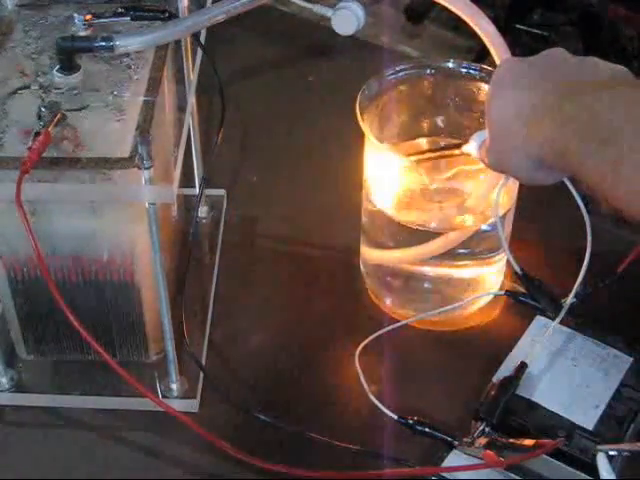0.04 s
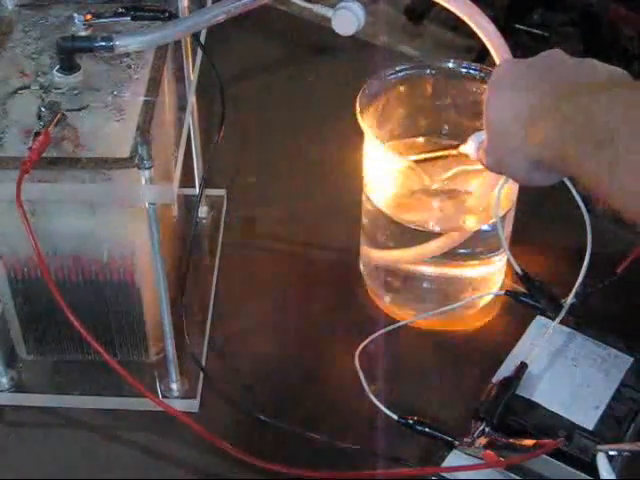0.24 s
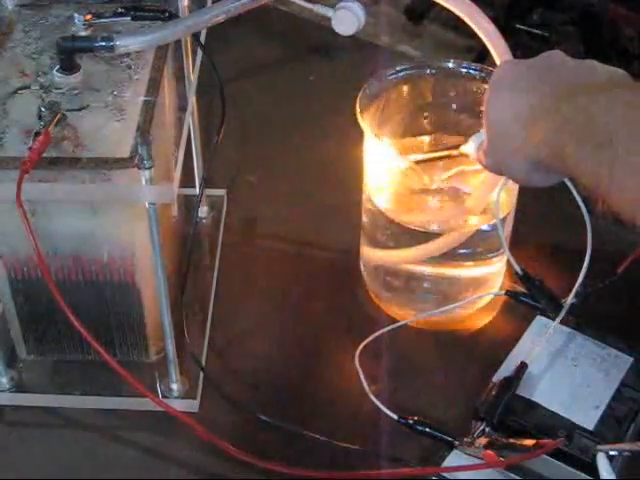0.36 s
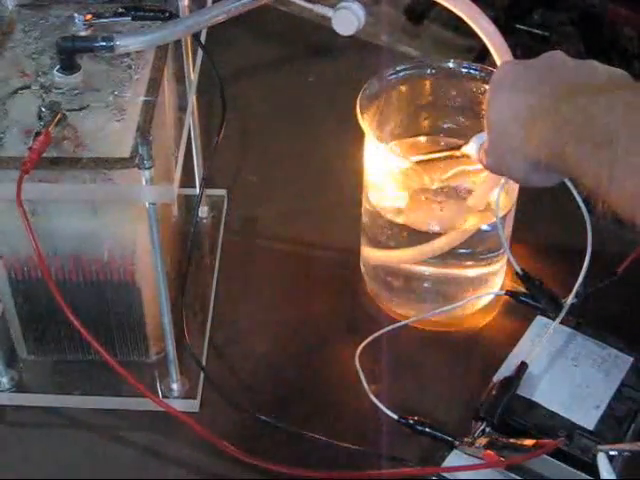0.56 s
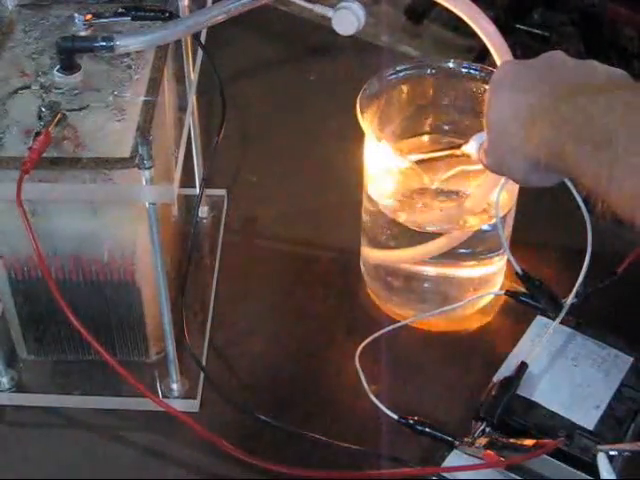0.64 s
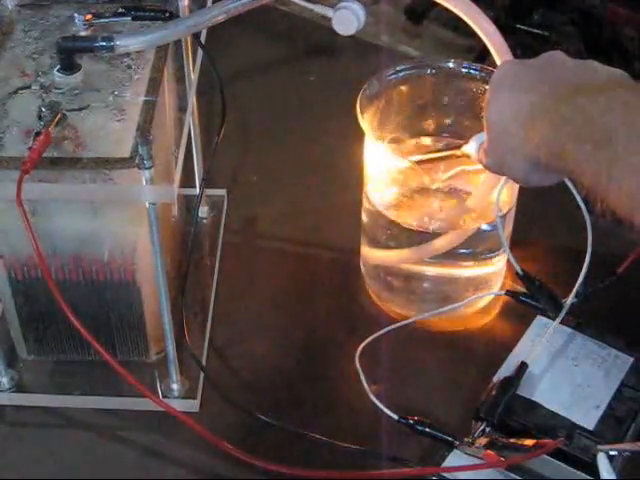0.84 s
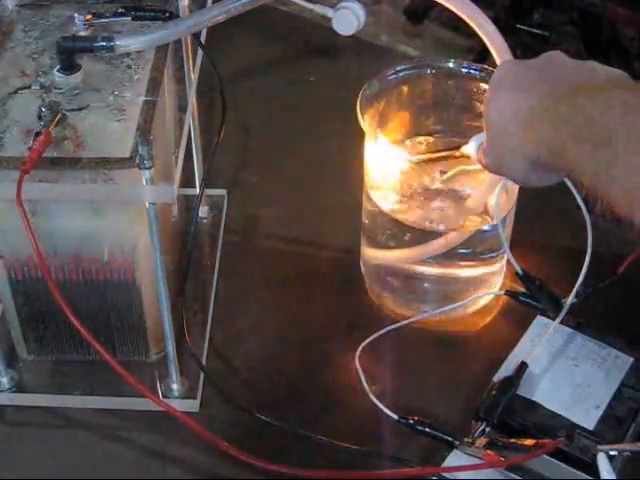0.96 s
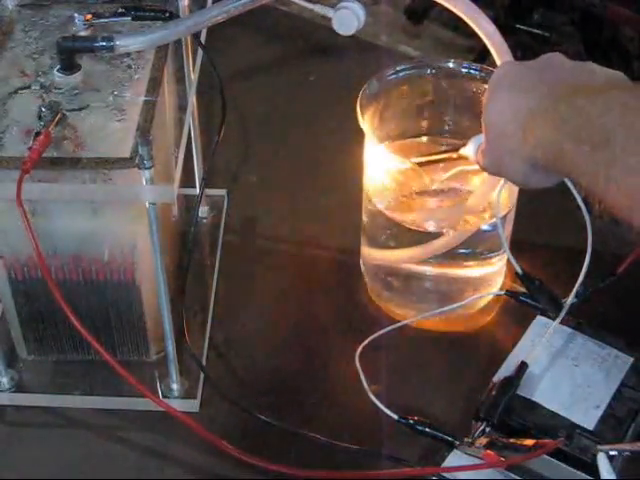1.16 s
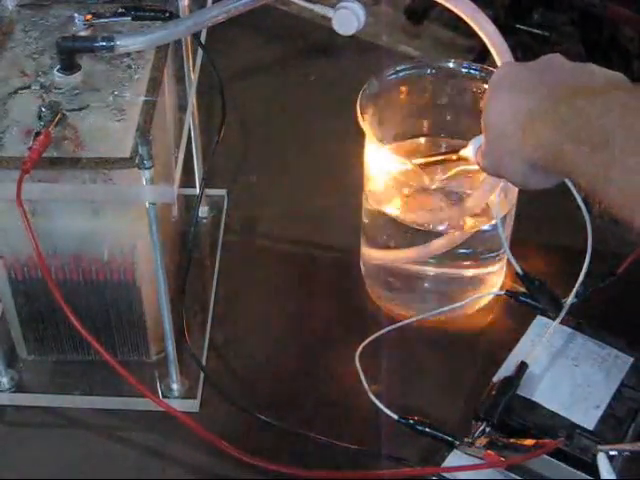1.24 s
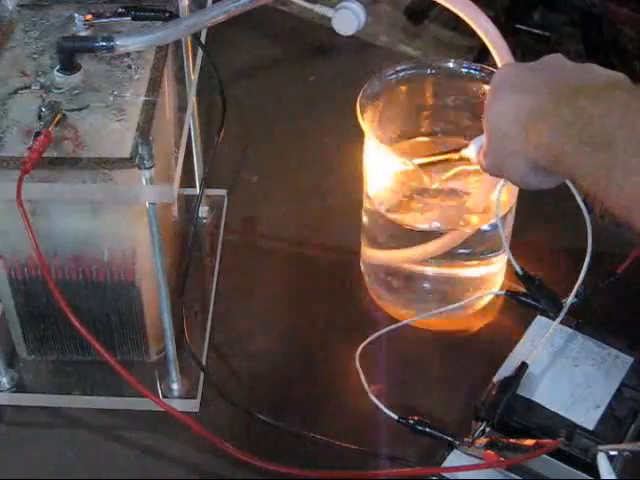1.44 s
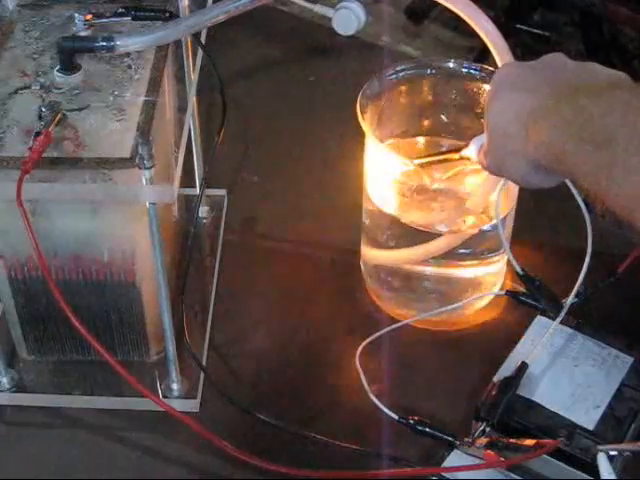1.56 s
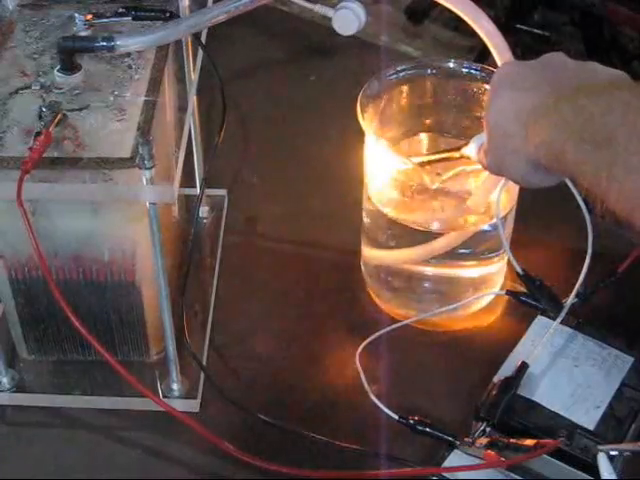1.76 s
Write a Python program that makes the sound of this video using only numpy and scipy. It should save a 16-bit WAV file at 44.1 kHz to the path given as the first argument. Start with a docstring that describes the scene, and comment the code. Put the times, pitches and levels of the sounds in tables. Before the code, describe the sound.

Three sharp pops of gas bubbles igniting on water, with soft glugs and hiss.

```python
"""Gas bubbles ignite at the water surface of a glass beaker in a small room. First the echoes of a pop die away.
At 0.2 s a bubble thumps and bangs, exciting the resonances of the beaker's air; bench and walls reflect it.
From 0.6 s bubbles oscillate under water in soft glugs and a rush of gas swells, falling back after the next
pop at 1.0 s. More glugs lead to a last pop at 1.5 s, and the rush starts to rise again. Throughout, a small
camera rounds the peaks by saturation and adds the grainy quantisation hiss of its coarse converter."""
import sys
import numpy as np
from scipy import signal
from scipy.fft import rfft, irfft, next_fast_len
from scipy.io import wavfile

SR = 44100
rng = np.random.default_rng(int(sys.argv[2]) if len(sys.argv) > 2 else 0)


def transcribe(u):
    """Save the signal u as a 16-bit wav file named by the first command-line argument.

    u: samples, shape (n,) or (channels, n), limited to [-1, 1]; the rate is SR.
    q: integer samples, one column per channel.
    """
    v = np.clip(np.atleast_2d(u).T, -1, 1)
    q = np.round(v * 32767).astype(np.int16)
    wavfile.write(sys.argv[1], SR, q)


N = 79380

# ignitions: t/s, level/dB, thump-to-bang delay/s, thump f/Hz, thump level/dB, snap f/Hz, snap level/dB,
# crack level/dB, crack cutoff f/Hz, glass f/Hz, glass level/dB; all levels are relative gains
POPS = [(-0.112, -1.5, 0.00036, 235, -3.5, 1120, -12.5, 1.5, 3020, 1880, -46.5),
        (0.209, 0, 0.00048, 242.6, -0.5, 1250, -1.5, 1, 5360, 2990, -47),
        (1.038, 0.5, 0.00002, 241.7, 4, 1067, -10.5, -1, 3240, 1932, -41),
        (1.4657, 0, 0, 277, 0, 1016, -13.5, -1, 2740, 2840, -48.5)]
def pops(response):
    """Convolution: each pop excites the room; the first, before t = 0, leaves only its decay."""
    out = np.zeros(N)
    for start, db, *character in POPS:
        add(out, undb(db) * signal.fftconvolve(pop(*character), response)[:N], start)
    return out


THUMP_DB, THUMP_T60_S = -5, .013
SNAP_T60_S, GLASS_T60_S = .0086, .2  # the snap is an upper resonance of the beaker's air, tuned per pop
BURN_S = .00052  # time for the flame to cross a bubble
CRACK_DELAY_S = .0011  # after the bang
# modes of the air in the beaker: f/Hz, level/dB, T60/s
BEAKER_MODES = [(491.3, -11.5, .019), (742.4, 2.5, .0125), (2399, -20.5, .007)]
def pop(delay, thump_hz, thump_db, snap_hz, snap_db, crack_db, crack_hz, glass_hz, glass_db):
    """Impulse excitation: a bubble ignites with a thump, and its bang sets air and glass ringing."""
    out = undb(THUMP_DB + thump_db) * ring(thump_hz, THUMP_T60_S)
    air = sum(undb(db) * ring(hz, t60) for hz, db, t60 in BEAKER_MODES)
    snap = undb(snap_db) * ring(snap_hz, SNAP_T60_S)
    glass = undb(glass_db) * ring(glass_hz, GLASS_T60_S)
    add(out, (air + snap) * swell(BURN_S) + glass, delay)
    add(out, crack(crack_db, crack_hz), delay + CRACK_DELAY_S)
    return out + hollow()


CRACK_DB, CRACK_T60_S, CRACK_RISE_S = -9, .008, .00025
# spectrum of the crack before its low-pass: f/Hz, level/dB
CRACK_SPECTRUM = [(100, -25.5), (700, 5.5), (1300, -3.5), (1700, -11), (2500, -3), (4000, -8.5),
                  (5500, -7.5)]
def crack(db, cutoff_hz):
    """Broadband transient: the sharp edge of the bang is a brief burst of noise."""
    lowpass = signal.butter(3, cutoff_hz, fs=SR, output="sos")
    burst = signal.sosfilt(lowpass, noise(CRACK_SPECTRUM))
    return undb(CRACK_DB + db) * burst * fade(CRACK_T60_S) * swell(CRACK_RISE_S)


HOLLOW_HZ, HOLLOW_RISE_HZ_PER_S, HOLLOW_DB, HOLLOW_T60_S = 111, 420, -38, .4
def hollow():
    """Cavity resonance: the hollow blown into the water closes with a faint rising note."""
    t = np.arange(N) / SR
    mean_hz = HOLLOW_HZ + HOLLOW_RISE_HZ_PER_S * t / 2
    return undb(HOLLOW_DB) * ring(mean_hz, HOLLOW_T60_S)


GLUG_T60_S, GLUG_RISE_S = .02, .00056
CHURN_DB, CHURN_T60_S = -14, .25
# spectrum of the churning water: f/Hz, level/dB
CHURN_SPECTRUM = [(80, -20.5), (180, -3), (320, -1), (450, -5), (700, -21.5), (2000, -28)]
# bubbles leaving the tube under water: t/s, level/dB, f/Hz
GLUGS = [(0.6016, -32, 333.5), (0.6111, -31, 262), (0.628, -35, 362), (0.9938, -25, 363),
         (1.0064, -25.5, 259), (1.0162, -27, 311), (1.3983, -32.5, 318), (1.4079, -29.5, 307.5)]
def glugs(response):
    """Damped oscillation: each bubble breaks loose, wobbles for a few cycles and churns the water."""
    out = np.zeros(N)
    for start, db, hz in GLUGS:
        wobble = 2 * ring(hz, GLUG_T60_S)
        churn = undb(CHURN_DB) * noise(CHURN_SPECTRUM) * fade(CHURN_T60_S)
        glug = (wobble + churn) * swell(GLUG_RISE_S)
        add(out, undb(db) * signal.fftconvolve(glug, response)[:N], start)
    return out


# envelope of the gas stream: t/s, level/dB
RUSH_ENVELOPE = [(0, -59.5), (0.539, -63.5), (.66, -46), (.76, -42.5), (.86, -37), (.98, -36.5),
                 (1.081, -42), (1.198, -62.5), (1.661, -60), (1.8, -47)]
# its spectrum: f/Hz, level/dB
RUSH_SPECTRUM = [(25, 1.5), (65, 6), (150, -9), (300, -1.5), (450, -3.5), (620, -2.5), (850, -1),
                 (1200, -10), (2000, -16.5), (3500, -21.5), (5500, -22)]
def gas_rush():
    """Flow noise: gas streams more strongly for a while, dies back and begins to build again."""
    times, levels = np.array(RUSH_ENVELOPE).T
    level_db = np.interp(np.arange(N) / SR, times, levels)
    return noise(RUSH_SPECTRUM) * undb(level_db)


TAIL_DB, TAIL_T60_S, ROOM_BUILD_S = -13.5, .55, .015
# echoes from bench, apparatus and walls: delay t/s, level/dB
ECHOES = [(0.0036, -10), (0.0057, -5), (0.0131, -19.5), (0.0188, -19.5), (0.0222, -15.5), (0.0268, -19),
          (0.0303, -18.5), (0.0386, -21.5), (0.0419, -21.5), (0.0459, -19), (0.0589, -17.5), (0.0631, -27),
          (0.0722, -25.5), (0.0759, -20.5), (0.0832, -27.5), (0.0908, -26.5), (0.1044, -26.5),
          (0.1119, -29), (0.1234, -27.5), (0.1469, -35)]
# filter on the reflected sound: f/Hz, level/dB
REFLECTION_SPECTRUM = [(40, -42), (90, -30), (130, -13.5), (200, -11.5), (300, -5.5), (400, -8),
                       (480, -2.5), (600, 2.5), (740, -.5), (920, 2.5), (1200, -11), (1500, -14.5),
                       (2000, -5.5), (5500, -7.5)]
# lingering resonances of the room: f/Hz, level/dB, T60/s
ROOM_MODES = [(373, -66.5, .35), (474, -66.5, .35), (525.1, -63, 0.41), (599.3, -60, 0.28),
              (686.6, -63.5, .45), (770.4, -67.5, .45), (858.3, -66.5, .38), (1017, -67.5, 0.26)]
def room_response():
    """Reverberation: the direct impulse is followed by echoes, a diffuse tail and room modes."""
    reflections = rng.standard_normal(N) * fade(TAIL_T60_S) * swell(ROOM_BUILD_S)
    reflections *= undb(TAIL_DB) / np.linalg.norm(reflections)
    for delay, db in ECHOES:
        reflections[int(delay * SR)] += undb(db)
    modes = sum(undb(db) * ring(hz, t60) for hz, db, t60 in ROOM_MODES) * swell(ROOM_BUILD_S)
    return signal.unit_impulse(N) + colour(reflections, REFLECTION_SPECTRUM) + modes


AIR_DB, HUM_HZ, HUM_DB = -49, 296.5, -62
# spectrum of the room air: f/Hz, level/dB
AIR_SPECTRUM = [(20, 5), (70, 7), (170, -5), (300, -4), (450, -6), (780, 3), (1100, -7), (2000, -13.5),
                (5500, -20)]
def background():
    """Stationary noise floor: quiet room air and a faint electrical hum."""
    hum = np.sqrt(2) * np.sin(2 * np.pi * HUM_HZ * np.arange(N) / SR)
    return undb(AIR_DB) * noise(AIR_SPECTRUM) + undb(HUM_DB) * hum


def undb(db):
    """Amplitude ratio of a level in decibels."""
    return 10 ** (np.asarray(db) / 20)


def colour(x, points):
    """Minimum-phase filtering through points of f/Hz, level/dB."""
    size = next_fast_len(2 * N)
    hz, db = np.array(points, float).T
    f = np.maximum(np.fft.rfftfreq(size, 1 / SR), 1)
    gain = undb(np.interp(np.log(f), np.log(hz), db))
    cepstrum = irfft(np.log(gain), size)
    cepstrum[1:size // 2] *= 2  # folding onto positive time makes the filter causal
    cepstrum[size // 2 + 1:] = 0
    return irfft(rfft(x, size) * np.exp(rfft(cepstrum)), size)[:len(x)]


def noise(points):
    """Spectrally shaped noise of rms 1 within the band of the converter."""
    white = rng.standard_normal(N // HOLD_SAMPLES + 1)
    x = colour(signal.resample_poly(white, HOLD_SAMPLES, 1)[:N], points)
    return x / np.std(x)


def swell(seconds):
    """Exponential attack with the given time constant."""
    return 1 - np.exp(-np.arange(N) / SR / seconds)


def fade(t60):
    """Exponential decay by 60 dB in t60 seconds."""
    return np.exp(-np.log(1000) * np.minimum(np.arange(N) / SR / t60, 10))


def ring(hz, t60):
    """Free vibration of one damped mode."""
    return np.sin(2 * np.pi * hz * np.arange(N) / SR) * fade(t60)


def add(out, x, start):
    """Superpose x on out from a start time, which may be negative."""
    i = int(round(start * SR))
    x = x[max(-i, 0):N - max(i, 0)]
    out[max(i, 0):max(i, 0) + len(x)] += x


def scene():
    """Superposition: pops and glugs reverberate over the gas rush and the background."""
    response = room_response()
    out = gas_rush() + background() + pops(response) + glugs(response)
    return out[None]


MIC_LOW_HZ, SATURATION_LIMIT, TOP_HZ = 72.2, .52, 16000
HOLD_SAMPLES, STEPS_PER_UNIT, BIAS_STEPS = 4, 128, -.36
def record(dry):
    """Saturation and quantisation: a microphone thins the bass and rounds peaks for an 8-bit converter."""
    thin = signal.sosfilt(signal.butter(1, MIC_LOW_HZ, "high", fs=SR, output="sos"), dry)
    rounded = SATURATION_LIMIT * np.tanh(thin / SATURATION_LIMIT)
    slow = signal.resample_poly(rounded, 1, HOLD_SAMPLES, axis=1, window="boxcar")
    quantised = np.round(slow * STEPS_PER_UNIT + BIAS_STEPS) / STEPS_PER_UNIT
    held = np.repeat(quantised, HOLD_SAMPLES, axis=1)[:, :N]  # mirrors the spectrum into the treble
    return signal.sosfilt(signal.ellip(10, .1, 80, TOP_HZ, fs=SR, output="sos"), held)


dry = scene()
out = record(dry)
transcribe(out)
```